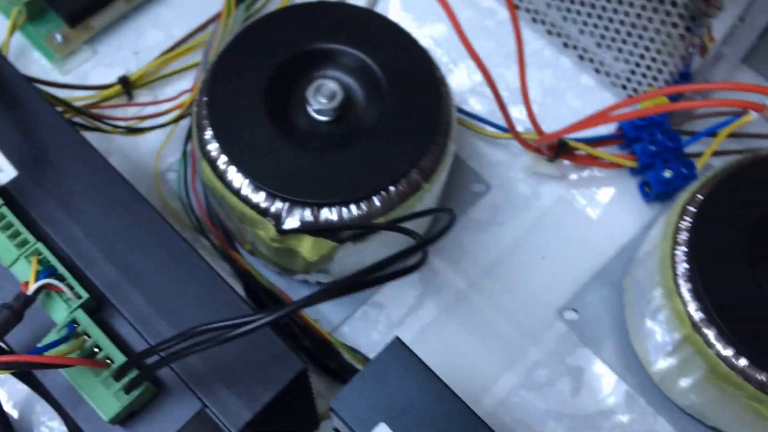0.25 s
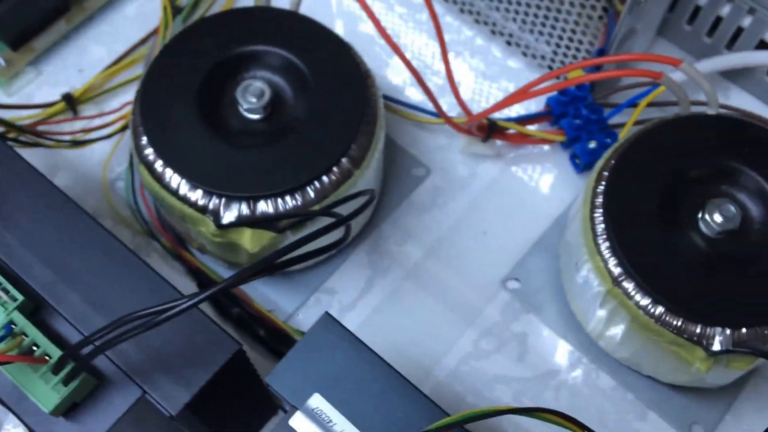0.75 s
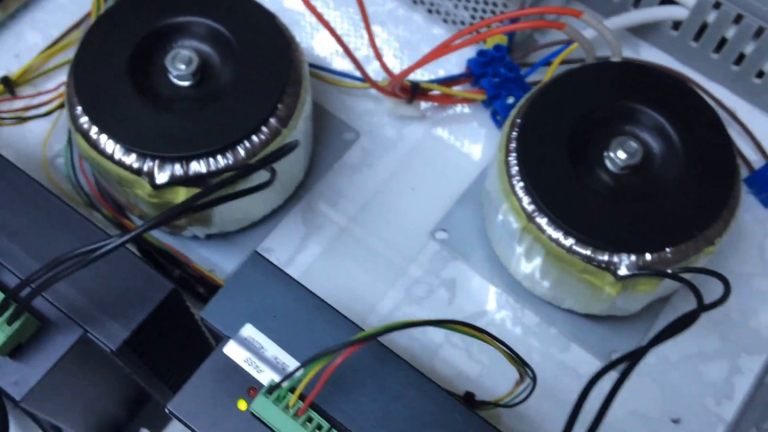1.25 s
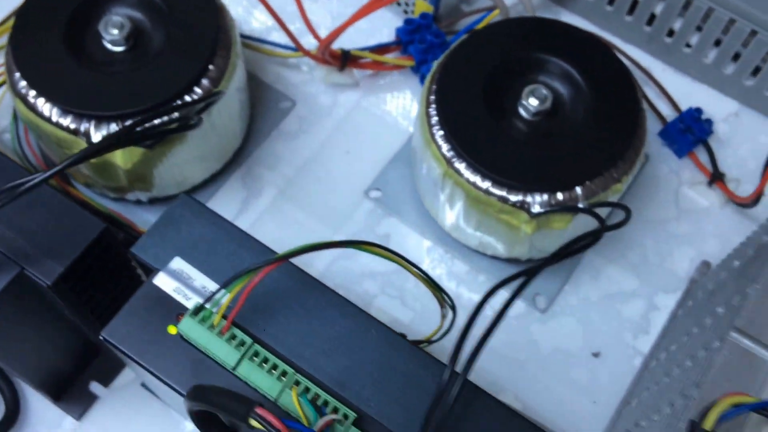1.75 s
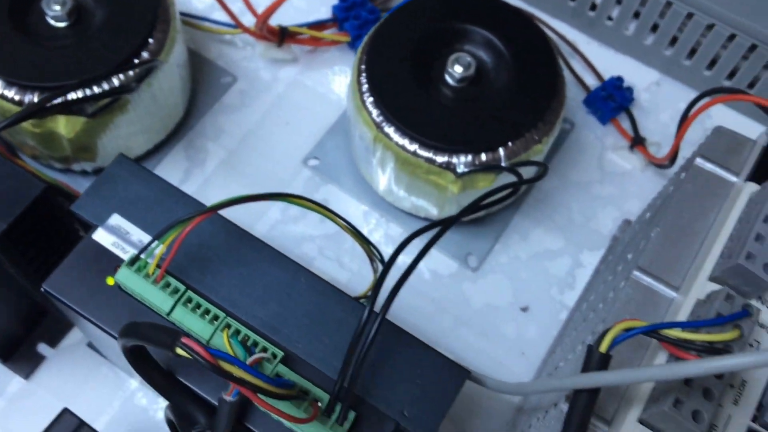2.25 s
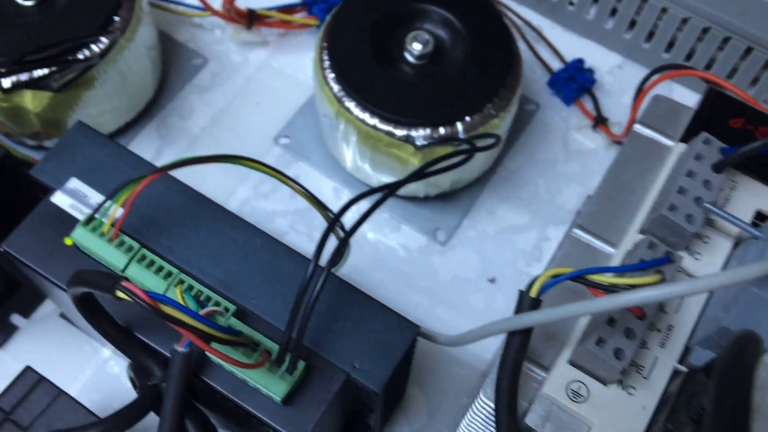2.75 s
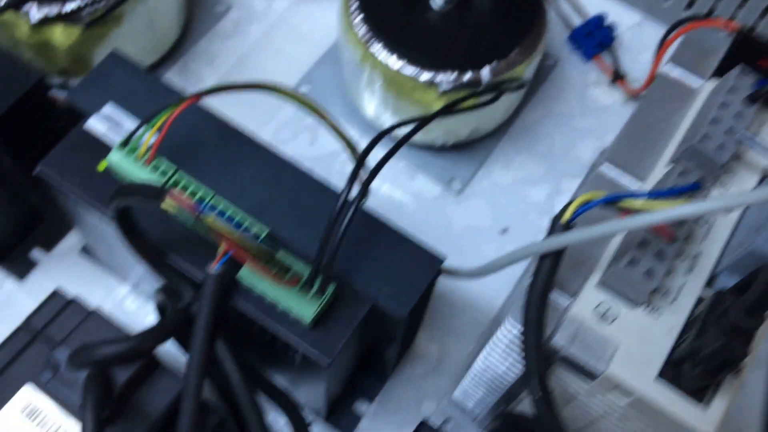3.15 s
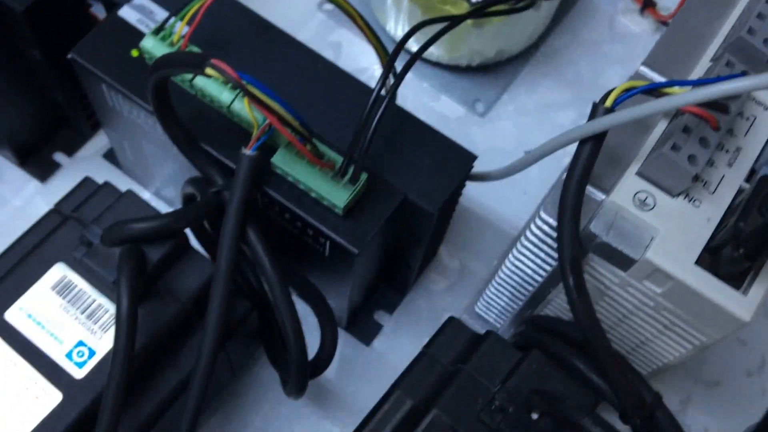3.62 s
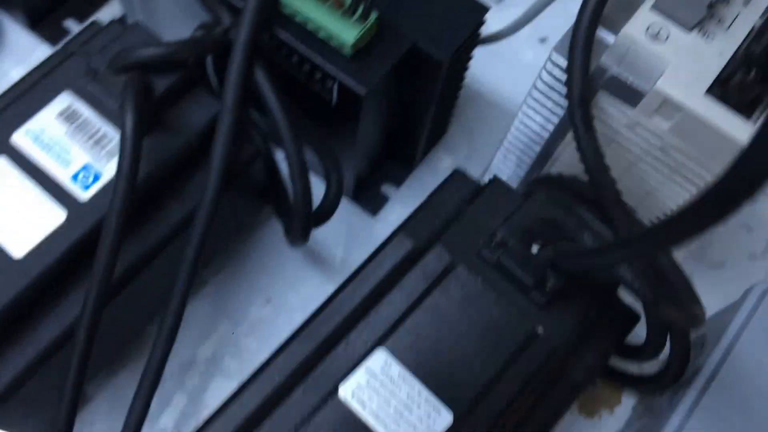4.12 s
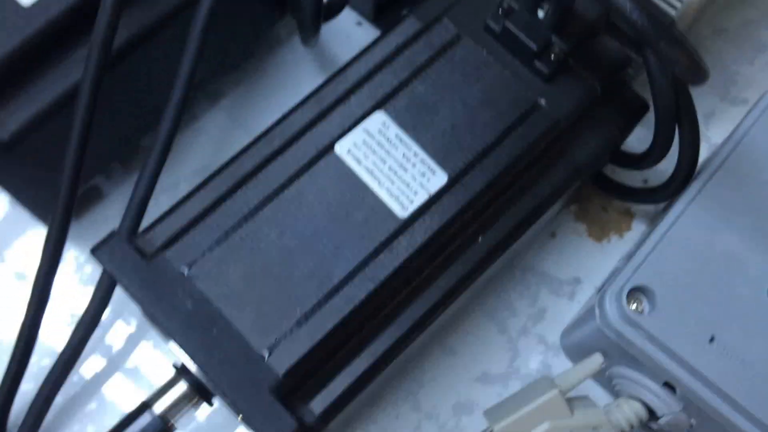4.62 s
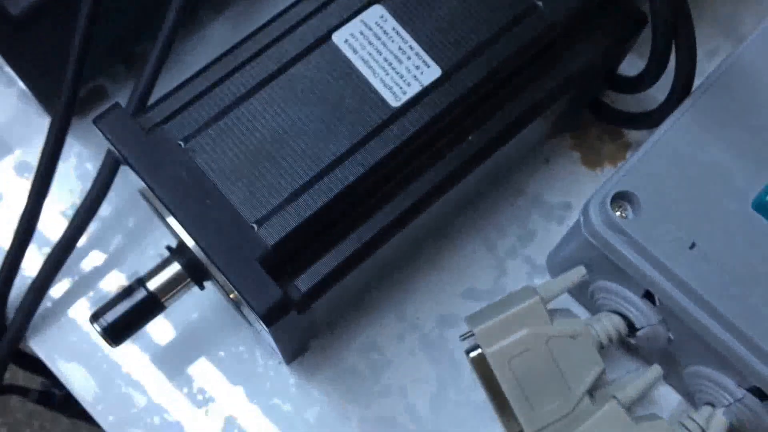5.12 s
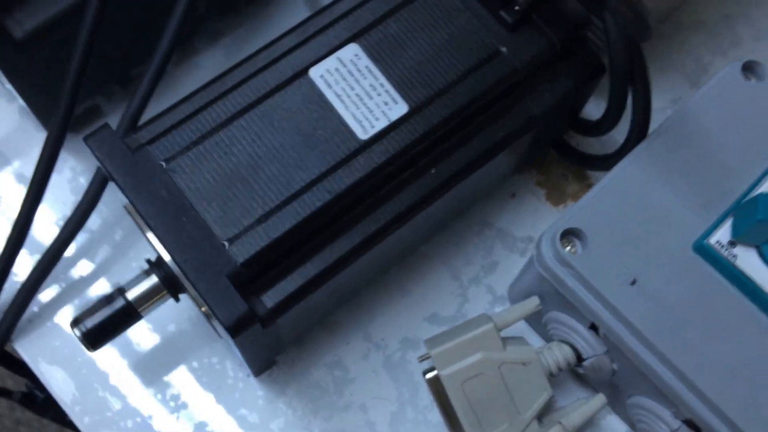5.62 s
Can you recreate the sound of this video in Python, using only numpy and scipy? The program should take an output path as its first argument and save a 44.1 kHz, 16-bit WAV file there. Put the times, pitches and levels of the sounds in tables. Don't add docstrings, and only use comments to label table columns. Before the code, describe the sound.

Two stepper motors run in turn on a workshop bench, faint then loud, with low engine thrum and room air beneath.

```python
import sys
import numpy as np
from scipy import signal
from scipy.fft import rfft, irfft, next_fast_len
from scipy.io import wavfile
from scipy.ndimage import uniform_filter1d

SR = 44100
rng = np.random.default_rng(int(sys.argv[2]) if len(sys.argv) > 2 else 0)


def invert_db(x):
    u = np.asarray(x, float) / 20
    return 10 ** u


def output_pcm(signal):
    pcm = np.clip(np.atleast_2d(signal).T, -1, 1) * 32767
    wavfile.write(sys.argv[1], SR, np.round(pcm).astype(np.int16))


N = 258867
T = np.arange(N) / SR


def shaped(x, response):
    size = next_fast_len(len(x) + SR // 4)
    return irfft(rfft(x, size) * response(np.fft.rfftfreq(size, 1 / SR)), size)[:len(x)]


def level(x, db):
    return x * invert_db(db) / np.sqrt(np.mean(x ** 2))


def modes(hz, table, floor_db=-40):
    response = invert_db(floor_db)
    for f, width, db in table:
        response = response + invert_db(db) * 1j * hz * width / (f * f - hz * hz + 1j * hz * width)
    return response


def ring(hz, width_hz):
    return level(shaped(rng.standard_normal(N), lambda f: modes(f, [(hz, width_hz, 0)], floor_db=-63) ** 2), 0)


def walk(rate_hz):
    return level(shaped(rng.standard_normal(N), lambda f: 1 / (1 + (f / rate_hz) ** 2)), 0)


def room(x, t60, wet_db):
    t = np.arange(SR // 2) / SR
    tail = rng.standard_normal(len(t)) * np.exp(-np.log(1000) * t / t60) * (t > .004)
    return x + signal.fftconvolve(x, tail * invert_db(wet_db) / np.sqrt(np.sum(tail ** 2)))[:N]


def at_speed(speed):
    share = np.interp(T, *np.transpose(speed), left=0)
    return uniform_filter1d(1. * (share > .97), int(.15 * SR))


# f/Hz, level/dB
AIR_COLOUR = [(65, -35), (110, 4), (279, -11.5), (330, -9.5), (366, -18.5), (488, -17.5), (724, -23),
              (967, -16), (1350, -18), (1960, -18), (4660, -31), (5170, -34), (15500, -51)]


def workshop_air():
    hz, db = np.transpose(AIR_COLOUR)
    air = shaped(rng.standard_normal(N), lambda f: invert_db(np.interp(np.log(f + 1), np.log(hz), db)))
    air = level(air, -52) + invert_db(-71) * ring(495.3, 26) + invert_db(-72) * ring(992.4, 40)
    return air * invert_db(2.1 - 1 * at_speed(FAR_SPEED) - 3.5 * at_speed(NEAR_SPEED) + 0.8 * walk(4.8))


# t/s, length/s, level/dB
ENGINE_SWELLS = [
    (.02, .15, -48),
    (.38, .33, -48),
    (1.03, .5, -53),
    (2.17, .2, -47),
    (2.55, .55, -53),
    (3.53, .42, -36),
    (3.98, .3, -41.5),
    (5.1, .9, -50),
]


def engine_swell():
    attack_s, release_s, idle_db = .07, .08, -60
    swells = []
    for start, length, db in ENGINE_SWELLS:
        rise = np.clip((T - start) / attack_s, 0, 1)
        fall = np.exp(-np.maximum(T - start - length, 0) / release_s)
        swells.append(invert_db(db) * rise * fall)
    return np.max(swells, axis=0) + invert_db(idle_db)


def rumble(swell):
    settles_s = .9
    settling_db = 7 * (T < settles_s) * np.sin(np.pi * T / settles_s)
    gain = invert_db(-57 + settling_db - 3 * at_speed(NEAR_SPEED)) + invert_db(-17) * swell
    low = ring(57.7, 29) + invert_db(-2.5) * ring(85.3, 31.6) + invert_db(-7.5) * ring(104.7, 32) + invert_db(-31) * ring(28, 20)
    return low * gain * invert_db(3.0 * walk(12))


# t/s, strongest tone f/Hz
ENGINE_PITCH = [(0, 76), (.55, 70), (1.2, 74), (2.3, 77), (3.4, 65), (3.62, 74), (3.88, 75), (4.3, 67),
                (4.5, 64.5), (5.0, 67), (5.5, 71), (5.87, 72)]
# multiple of the strongest tone, level/dB
ENGINE_ORDERS = [(1.5, -63), (2, -65), (2.5, -63), (3, -64)]


def engine_thrum(swell):
    orders_from_s = 3.5
    pitch_hz = np.interp(T, *np.transpose(ENGINE_PITCH))
    turn = 2 * np.pi * np.cumsum(pitch_hz + .6 * walk(3.95)) / SR
    thrum = np.sqrt(2) * np.sin(turn) + invert_db(-18) * np.sin(2 * turn + 1)
    sway = walk(3)
    orders = np.zeros(N)
    for k, db in ENGINE_ORDERS:
        orders += invert_db(db + 4 * np.roll(sway, int(k * SR))) * np.sin(k * turn)
    fade_in = np.clip(T - orders_from_s, 0, .2) / .2
    return thrum * swell * invert_db(1.4 * walk(21)) + orders * fade_in


def bounce_db(hz, detour_cm, strength):
    sound_cm_s = 34300
    db = 20 * np.log10(abs(1 + strength * np.exp(2j * np.pi * hz * detour_cm / sound_cm_s)))
    return db - db.mean()


TEETH, TOOTH_HZ, RIPPLE_HZ = 50, 1286.58, 99.7
FIRST_FOLD = 4
STEP_BEATS = [(16, 1), (32, 2), (48, 3)]
RAMP_SHARES = [.3, .6, 1]


def motor(speed, chop_hz, teeth_db, fold_db, beat_db, shaft, shaft_db, body, tones_hz, path, ramp_db,
          ripple, sag, hunt, jitter, sweep_db, whirr_db, whirr_hz, scrape, push, cut_hz,
          bounce, settle_db, settle_s, steep):
    share = np.interp(T, *np.transpose(speed), left=0, right=0)
    on = slice(*np.flatnonzero(share)[[0, -1]])
    angle = 2 * np.pi * TOOTH_HZ * np.cumsum(share) / SR
    rotor = (angle + hunt * walk(12))[on]
    field = rotor + (jitter * walk(100) + ripple * np.sin(2 * np.pi * RIPPLE_HZ * T))[on]
    t, share = T[on], share[on]
    settle = settle_db * np.exp(-np.maximum(t - speed[1][0], 0) / settle_s)
    detour_cm = np.interp(t, *np.transpose(path))
    caught = [bounce_db(hz, detour_cm, bounce) + settle for hz in tones_hz]
    effort = share ** push * (1 - sag * np.cos(2 * np.pi * RIPPLE_HZ * t))
    changing = uniform_filter1d(1. * (share < 1), size=300)

    # tooth harmonic, chopper harmonic, level in dB, phase it follows
    lines = [(k + 1, 0, db, field) for k, db in enumerate(teeth_db)]
    lines += [(k + FIRST_FOLD, 1, db, field) for k, db in enumerate(fold_db)]
    lines += [(k, m, db, rotor) for (k, m), db in zip(STEP_BEATS, beat_db)]
    lines += [(k / TEETH, 0, db, rotor) for k, db in zip(shaft, shaft_db)]

    whirr = shaped(rng.standard_normal(len(t)), lambda f: 1 / (1 + 1j * f / whirr_hz))
    once_a_turn = 1 + scrape * np.cos(rotor / TEETH)
    force = invert_db(whirr_db + caught[0] + 8.5 * changing) * effort * whirr * once_a_turn

    def path_of(f):
        return modes(f, body) / (1 + (cut_hz / (f + 1)) ** steep)

    for k, m, db, phase in lines:
        hz = abs(k * TOOTH_HZ - m * chop_hz)
        gain_db = caught[np.argmax(np.abs(hz - np.array(tones_hz)) < 10)]
        if m == 0 and k in range(1, len(ramp_db) + 1):
            ramp_gain_db = np.interp(share, RAMP_SHARES, ramp_db[k - 1])
            gain_db = gain_db * (1 - changing) + changing * ramp_gain_db
        heard = np.abs(k * TOOTH_HZ * share - m * chop_hz) < .45 * SR
        weight = effort * np.where(share < .97, invert_db(-36) if k > 12 else 1, 1)
        tone = np.sin(k * phase - 2 * np.pi * m * chop_hz * t + 2 * np.pi * rng.random())
        force += np.sqrt(2) * invert_db(db + gain_db) / abs(path_of(hz)) * weight * heard * tone

    for k, m in [(32, 0), (32, 1), (64, 0), (64, 1), (64, 2), (64, 3)]:
        heard = (np.abs(k * TOOTH_HZ * share - m * chop_hz) < .4 * SR) * (1 - share) ** 1.5
        force += invert_db(sweep_db - 5 * (k > 32)) * heard * np.sin(k * field - 2 * np.pi * m * chop_hz * t)
    out = np.zeros(N)
    out[on] = force
    return shaped(out, path_of)


# t/s, share of full speed
FAR_SPEED = [
    (.281, 0.027),
    (.441, 1),
    (2.268, 1),
    (2.428, 0),
]
FAR_TEETH_DB = [-42.5, -55, -79, -63, -76.5, -73, -67, -81, -95, -88]
FAR_FOLD_DB = [-73, -68.6, -95, -92, -72.5, -75, -90, -101]
FAR_BEAT_DB = [-57, -55, -58]
FAR_SHAFT = [49, 50.5, 51, 95, 97, 119, 145, 155, 190, 201, 214]
FAR_SHAFT_DB = [-54, -55, -62, -51.5, -69, -76, -83, -66.5, -82, -73, -74.5]
# f/Hz, width/Hz, level/dB
FAR_BODY = [(720, 110, -12.5), (1050, 180, -16), (1289, 63, -10.5), (1515, 90, -5), (2100, 150, -2.5),
            (2490, 130, -17), (3120, 170, -18), (5200, 460, -25), (8900, 1200, -21.5), (10400, 700, -43),
            (13400, 650, -41)]
FAR_TONES_HZ = [1287, 2573, 5146, 14930]
# t/s, detour/cm
FAR_PATH = [(.52, 2.2), (1.08, 4.7), (1.64, 6.2), (2.2, 7.3)]
# level/dB at slow, middle, full speed
FAR_RAMP_DB = [(-4, 6.5, 2), (-5, 9, 14), (12, 29, -6), (-9, -5, 2)]


def far_motor():
    return motor(FAR_SPEED, 20076.7, FAR_TEETH_DB, FAR_FOLD_DB, FAR_BEAT_DB, FAR_SHAFT, FAR_SHAFT_DB, FAR_BODY,
                 FAR_TONES_HZ, FAR_PATH, FAR_RAMP_DB, ripple=0.008, sag=0.012, hunt=0.027, jitter=.012,
                 sweep_db=-34.5, whirr_db=-35, whirr_hz=5030, scrape=0.42, push=0.85, cut_hz=460,
                 bounce=.83, settle_db=2.5, settle_s=.12, steep=6)


# t/s, peak level/dB, f/Hz, t60/s
KNOCKS = [
    (.282, -31.5, 2100, 0.038),
    (2.823, -39.5, 2210, 0.036),
    (4.345, -34, 920, 0.046),
]


def knocks():
    out = np.zeros(N)
    t = np.arange(SR // 10) / SR
    partials = [(1.003, 1), (.72, 0.44), (1.13, 0.55), (1.5, 0.29)]
    for s, db, hz, t60 in KNOCKS:
        burst = sum(g * np.sin(2 * np.pi * k * hz * t) for k, g in partials)
        envelope = np.exp(-np.log(1000) * t / t60) * (1 - np.exp(-t / 0.00049))
        out[int(s * SR):][:len(t)] += invert_db(db) * burst * envelope
    return out


NEAR_CHOP_HZ = 20112.0
# t/s, share of full speed
NEAR_SPEED = [
    (4.345, 0.046),
    (4.505, 1),
    (5.9, 1),
    (6.0, 1),
]
NEAR_TEETH_DB = [-23, -43, -28.5, -53, -65, -53, -68, -99, -88, -91]
NEAR_FOLD_DB = [-69, -74, -68]
NEAR_BEAT_DB = [-60, -46, -58]
NEAR_SHAFT = [30, 31, 39, 44.56, 49, 55, 63.2, 70, 90, 99, 101, 102, 134, 142, 158, 210, 261, 309]
NEAR_SHAFT_DB = [-79, -52.5, -54.5, -49, -32, -52, -56, -88, -48, -58, -56.5, -52, -68, -63, -54.5, -83,
                 -69, -72]
# f/Hz, width/Hz, level/dB
NEAR_BODY = [(831, 51, 1.5), (975, 79, -10), (1220, 150, -6.5), (1650, 53, -41), (2310, 114, -10.5),
             (2675, 200, -13), (3190, 93, -18.5), (3370, 110, -11.5), (3828, 210, -18), (5260, 410, -16),
             (6700, 870, -26), (7745, 190, -25), (9200, 200, -21), (10900, 200, -43), (14400, 400, -29)]
NEAR_TONES_HZ = [1287, 2573, 3860, 5146, 7720]
# t/s, detour/cm
NEAR_PATH = [(4.6, 2.6), (4.9, 6.0), (5.39, 6.8), (5.78, 6.9)]
# level/dB at slow, middle, full speed
NEAR_RAMP_DB = [(10, 8, 9), (11, 13, 7), (-12, 2, 4), (24, 6, 6), (14, 22, 5)]


def near_motor():
    return motor(NEAR_SPEED, NEAR_CHOP_HZ, NEAR_TEETH_DB, NEAR_FOLD_DB, NEAR_BEAT_DB, NEAR_SHAFT, NEAR_SHAFT_DB,
                 NEAR_BODY, NEAR_TONES_HZ, NEAR_PATH, NEAR_RAMP_DB, ripple=0.17, sag=0.093, hunt=0.024, jitter=0.03,
                 sweep_db=-26.5, whirr_db=-28.5, whirr_hz=9000, scrape=0.23, push=0.81, cut_hz=640,
                 bounce=.46, settle_db=2.5, settle_s=.1, steep=3)


def chopper_hiss():
    settle_s, flare_hz, flare_width_hz = .2, 11300, 2500
    start_s = NEAR_SPEED[0][0]
    since = T - start_s
    share = np.interp(T, *np.transpose(NEAR_SPEED), left=0)
    off_fold_hz = STEP_BEATS[1][0] * TOOTH_HZ * share % NEAR_CHOP_HZ - flare_hz
    idle = invert_db(np.interp(since, [-start_s, 0], [-90, -80]))
    starting = invert_db(-50) * np.exp(-np.abs(since) / settle_s)
    flare = invert_db(-38) * np.exp(-(off_fold_hz / flare_width_hz) ** 2)
    gain = idle + (since > 0) * (invert_db(-64) + starting + flare)
    hiss = ring(9200, 380.5) + invert_db(-4) * ring(10800, 400) + invert_db(-22) * ring(11000, 900)
    return hiss * gain


def scene():
    swell = engine_swell()
    shop = workshop_air() + rumble(swell) + engine_thrum(swell) + chopper_hiss()
    far = room(far_motor() + knocks(), 0.27, -13.5)
    near = room(near_motor(), 0.54, -12)
    return (far + near + shop)[None]


def low_pass(x):
    return signal.sosfilt(signal.butter(12, 16160, fs=SR, output="sos"), x)


def record(dry):
    top_hz = 15330
    mix = shaped(dry[0], lambda f: f < top_hz)[None]
    return low_pass(mix)


dry = scene()
out = record(dry)
output_pcm(out)
```